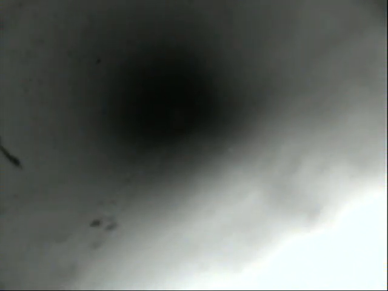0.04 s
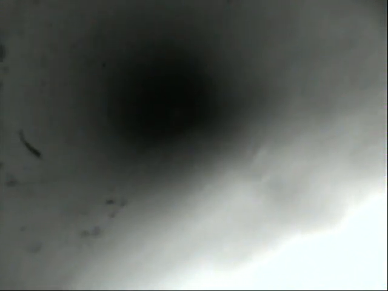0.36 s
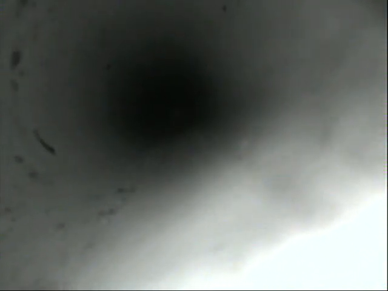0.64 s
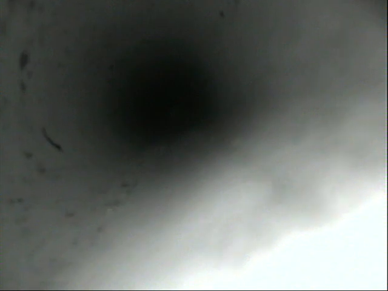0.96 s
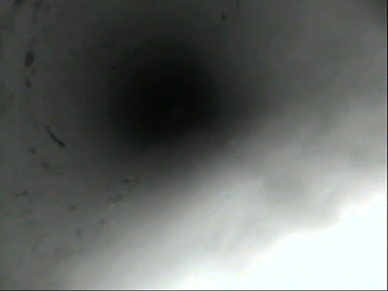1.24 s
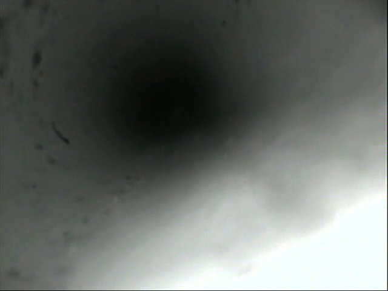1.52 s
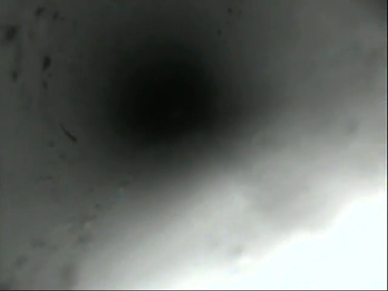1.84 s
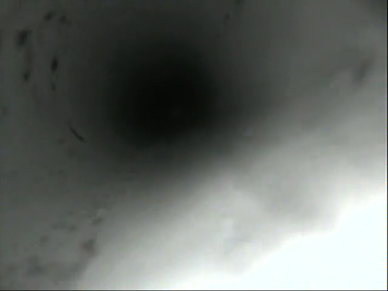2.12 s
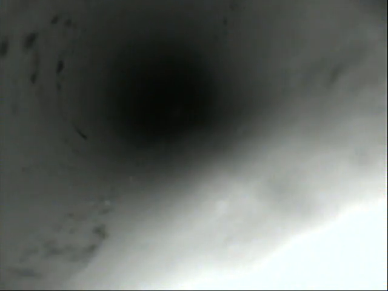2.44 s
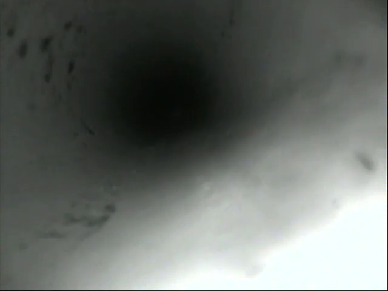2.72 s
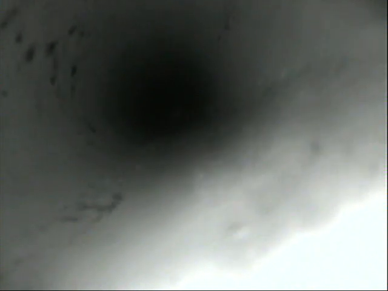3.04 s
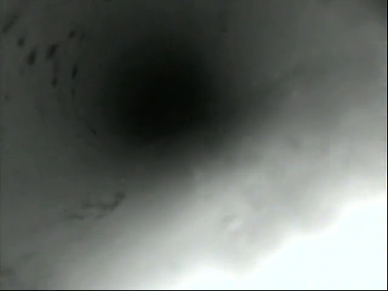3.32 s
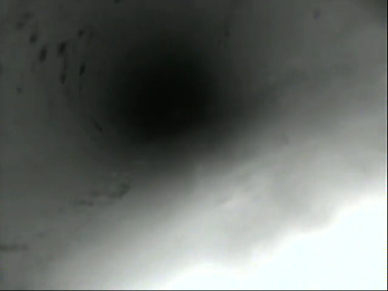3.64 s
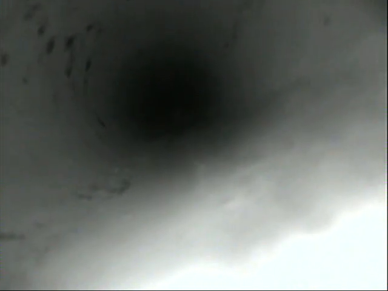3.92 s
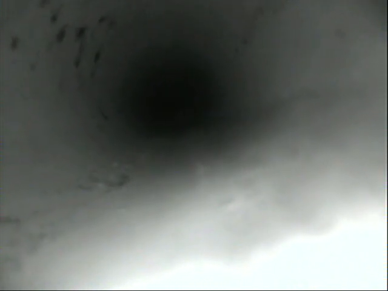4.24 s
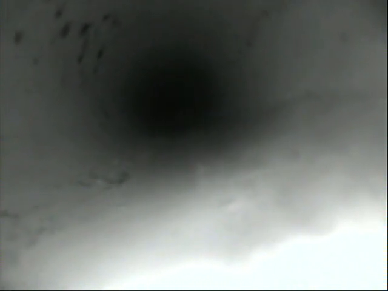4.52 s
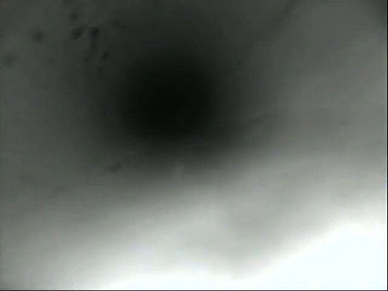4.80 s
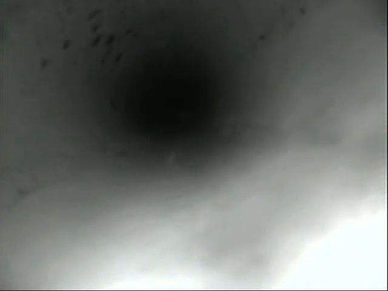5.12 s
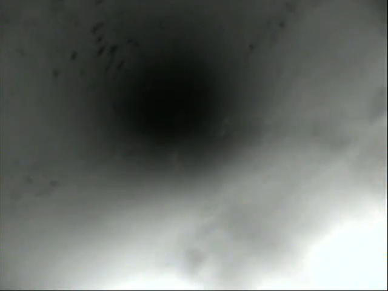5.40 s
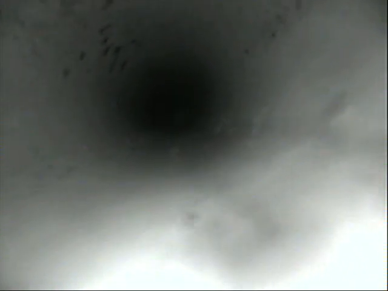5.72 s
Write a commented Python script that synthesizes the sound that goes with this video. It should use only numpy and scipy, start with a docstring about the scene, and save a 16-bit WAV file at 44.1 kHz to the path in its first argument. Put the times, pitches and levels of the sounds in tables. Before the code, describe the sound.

A steady electrical hum and thin whine sit over a low rumble and soft hiss throughout, heard close up on one microphone inside a sewer pipe. An inspection camera's head slides along with a faint, uneven rustle and small gritty scuffs. At about 0.2 seconds it gives a light double knock, followed by soft chafing and a faint squeak. The sound cuts out for an instant near 1.5 seconds. Quiet scuffs continue, with another faint squeak around 2.4 seconds. At 3.7 seconds comes the loudest event, a hard, quick clatter against the wall with a brief ring and a low thump from the push rod. Lighter knocks and a tiny squeak follow until 3.9 seconds. A duller knock lands at 4.5 seconds, then a cluster of soft bumps with a scrape around 4.8 to 4.9. The sliding dies down, leaving hum and hiss until nearly 6 seconds.

```python
"""An inspection camera's head knocks and scrapes along a sewer pipe, heard close up on one microphone.
A few times it clatters against the wall, each knock a quick run of contacts that ring the head and
thump its push rod. In between it slides with a faint rustle, scuffs over grit, chafes and squeaks.
Behind it the electronics hum and whine over a low rumble and hiss.
The narrow-band sound channel cuts out once for an instant."""
import sys
import numpy as np
from scipy import signal
from scipy.fft import rfft, irfft
from scipy.io import wavfile
from scipy.ndimage import uniform_filter1d

SR = 44100
rng = np.random.default_rng(int(sys.argv[2]) if len(sys.argv) > 2 else 0)


def log_audio(samples):
    """Write samples as a 16-bit WAV file to the path given in sys.argv[1]."""
    # one column per channel
    frames = np.atleast_2d(samples).T
    # limit to full scale, then quantise
    limited = np.clip(frames, -1, 1)
    pcm = np.round(limited * 32767).astype(np.int16)
    wavfile.write(sys.argv[1], SR, pcm)


N = 254016
T = np.arange(N) / SR

# resonances of the low rumble: centre_hz, width_hz, level_db
RUMBLE_BANDS = [(33.85, 3.2, -51.5), (59.1, 11, -54), (79.5, 4.3, -62)]
# colour of the steady hiss: frequency_hz, relative_db
HISS_COLOUR = [(15, 2), (60, 5), (95, 1.5), (170, -.5), (300, -4), (550, -5.5), (830, -4), (1250, -9),
               (1950, -14), (2350, -21.5), (3700, -25), (4700, -34), (6600, -35.5), (8800, -58.5)]
# harmonics of the electrical hum: multiple, level_db
HUM_HARMONICS = [(1, -52), (2, -64.5), (3, -61), (4, -61.5), (5, -67.5)]
# harmonics of the electrical whine: multiple, level_db
WHINE_HARMONICS = [(1, -67), (2, -67.5)]
# thin whistles of the electronics: pitch_hz, level_db
WHISTLE_TONES = [(4000, -88), (5626, -95), (5997, -96), (6250, -98), (6874, -96), (8000, -107)]
# soft stretches of chafing: peak_s, level_db, length_s
CHAFE_SWELLS = [(.28, -63, 0.34), (1.25, -66, 0.29), (2.1, -67, 0.3), (4.88, -62.5, 0.039)]
# squeaks where the head sticks and slips: peak_s, level_db, length_s, pitch_hz
SQUEAK_SWELLS = [(0.18, -73, .02, 5920), (0.4, -64, 0.12, 1880), (2.375, -63, 0.075, 1903),
                 (2.85, -75, 0.036, 6000), (3.879, -49, 0.0084, 2870), (3.948, -77, .025, 6000)]
# how hard the sliding head rubs the wall: time_s, friction_db
FRICTION_CURVE = [(0, -5), (.75, -0.5), (.98, -3), (1.27, -4), (1.52, -11), (1.75, -7), (2.76, -6),
                  (2.98, 1.5), (3.32, -1.5), (3.62, -7.5), (3.82, 3), (4.18, 2), (4.42, -11), (4.55, 0),
                  (5.02, -7), (5.25, 2), (5.42, -20), (5.76, -16)]
# colour of sliding and grit: frequency_hz, relative_db
GRIT_COLOUR = [(100, -8), (500, 7.5), (1200, 12), (1900, 1), (2400, -12.5), (3200, -11), (3800, -18),
               (4600, -18), (6200, -22.5), (7300, -30), (8700, -45.5)]
# scuffs over grit: peak_s, rub_db, length_s, tick_db
GRIT_SCUFFS = [(.005, -42, 0.053, -63), (0.14, -45.5, 0.022, -65), (0.206, -37, 0.022, -57),
               (0.326, -45.5, 0.026, -63), (1.659, -45.5, 0.022, -63), (1.742, -46, 0.024, -67),
               (1.823, -51, 0.025, -64), (2.147, -50.5, 0.021, -71), (2.22, -47.5, 0.02, -64),
               (2.572, -53, .016, -65), (3.052, -44, 0.023, -62), (3.218, -46, 0.024, -60.5),
               (3.429, -46.5, 0.019, -66), (4.85, -40.5, 0.11, -67.5)]
# resonances that crushed grains ring: centre_hz, width_hz, relative_db
GRAIN_BANDS = [(3750, 200, -2.5), (4030, 300, -8), (4570, 200, -15.5)]
# light swishes along the wall: peak_s, level_db, length_s
WALL_SWISHES = [(.175, -71, 0.023), (.51, -69, 0.012), (2.33, -74, .04), (2.855, -69.5, 0.026),
                (3.948, -73, 0.025), (4.85, -77, 0.067)]
# colour of a swish: frequency_hz, relative_db
SWISH_COLOUR = [(1500, -12), (3800, 7.5), (4800, 0.5), (6200, 3), (7300, -6.5), (9000, -34)]
# knocks on the wall: start_s, ring_db, thump_db, hardness_db_per_octave, first_gap_s, rebound_loss_db
WALL_KNOCKS = [(.202, -28, -55, -2, .007, 12), (.246, -38, -49, 6, .008, 6.5),
               (3.7064, -10.5, -18.5, 5, .0085, 3.5), (3.741, -22.5, -27, -5, .014, 6.5),
               (3.835, -25, -31.5, 2, .007, 4), (3.875, -25.5, -33, 1, .011, 6),
               (4.51, -21.5, -28.5, -10, .0102, 4.5), (4.818, -30.5, -29.5, -10.5, .009, 6.5),
               (4.834, -29, -43, -14, 0.0078, 12), (4.862, -28, -25.5, -9, 0.0091, 6),
               (4.907, -34, -34, 2, 0.0082, 17)]
# modes of the camera head: pitch_hz, relative_db, t60_s
HEAD_MODES = [(421, -27, 0.091), (669, -14, 0.089), (813, -4.5, 0.03), (1133, -1.5, 0.034),
              (1201, -1.5, 0.035), (1410, -22, 0.059), (1587, -16, 0.052), (1780, -16, 0.037),
              (2035, -32.5, 0.05), (2876, -31, 0.072), (3400, -32.5, 0.049), (4100, -43, 0.05),
              (5100, -34, 0.029)]
# low modes of the head on its push rod: pitch_hz, relative_db, t60_s
ROD_MODES = [(56.5, -1, 0.09), (136.6, 2.5, 0.073), (180.5, -9, 0.088)]
# colour of the crunch at each contact: frequency_hz, relative_db
CRUNCH_COLOUR = [(80, 9), (250, 2), (800, 3.5), (970, -3), (1200, 0), (1800, 0), (2300, -15), (3300, -17.5),
                 (4200, -26.5), (5300, -31), (6500, -48.5), (8700, -65)]


def undb(db):
    """Decibels to gain."""
    return 10 ** (np.asarray(db) / 20)


def unit(x):
    """Scale to rms 1."""
    return x / np.sqrt(np.mean(x ** 2))


def shape(x, gain):
    """Filter by a gain that is a function of frequency."""
    hz = np.maximum(np.arange(len(x) // 2 + 1) * SR / len(x), 1)
    return irfft(rfft(x) * gain(hz), len(x))


def noise(colour, size=N):
    """Noise of rms 1 with a colour of (frequency_hz, relative_db) points."""
    hz, db = np.transpose(colour)
    return unit(shape(rng.standard_normal(size), lambda f: undb(np.interp(np.log(f), np.log(hz), db))))


def resonant(hz, width):
    """Noise of rms 1 ringing in one resonance."""
    return unit(shape(rng.standard_normal(N), lambda f: 1 / (1 + 1j * (f * f - hz * hz) / (f * width))))


def walk(rate_hz):
    """Random levels held 1 / rate_hz seconds and smoothed twice; rms 1."""
    hold = max(int(SR / rate_hz), 1)
    steps = np.repeat(rng.standard_normal(N // hold + 1), hold)
    return unit(uniform_filter1d(uniform_filter1d(steps, hold), hold)[:N])


def tone(hz, db):
    """A steady sine of the given rms level."""
    return np.sqrt(2) * undb(db) * np.sin(2 * np.pi * (hz * T + rng.random()))


def fade(t, t60):
    """Exponential decay by 60 dB in t60 seconds."""
    return np.exp(-np.log(1000) * t / t60)


def swells(rows):
    """A bell-shaped rise and fall for each (peak_s, level_db, length_s) row."""
    return sum(undb(db) * np.exp(-2 * ((T - s) / length) ** 2) for s, db, length in rows)


def add(out, start_s, sound):
    """Mix a sound in at start_s."""
    start = int(start_s * SR)
    out[start:start + len(sound)] += sound


def background(hiss_db=-50.5, rumble_top_hz=200):
    """The bed inside the pipe: even hiss over a rumble in three low resonances."""
    rumble = sum(undb(db) * resonant(hz, width) for hz, width, db in RUMBLE_BANDS)
    rumble = shape(rumble, lambda f: 1 / (1 + (f / rumble_top_hz) ** 2))
    return rumble + undb(hiss_db) * noise(HISS_COLOUR)


def electronics(hum_hz=218.97, whine_hz=492.6, waver_db=-0.6):
    """The camera's electronics: two harmonic tones that waver together, and thin steady whistles."""
    hum = sum(tone(k * hum_hz, db) for k, db in HUM_HARMONICS)
    whine = sum(tone(k * whine_hz, db) for k, db in WHINE_HARMONICS)
    waver = undb(waver_db * walk(20))
    whistles = sum(tone(hz, db) for hz, db in WHISTLE_TONES)
    return (hum + whine) * waver + whistles


def chafing(centre_hz=2100, width_hz=650, top_hz=3500, grain_db=-3.5):
    """A soft, grainy rub in one broad resonance."""
    rub = shape(resonant(centre_hz, width_hz), lambda f: 1 / (1 + (f / top_hz) ** 6))
    return swells(CHAFE_SWELLS) * unit(rub * undb(grain_db * walk(500)))


def squeaks(pitch_spread=.009, rough_db=2):
    """The head sticks and slips: short tones whose pitch and strength are unsteady."""
    unsteady_time = np.cumsum(1 + pitch_spread * walk(300)) / SR
    tones = sum(swells([(s, db, length)]) * np.sin(2 * np.pi * hz * unsteady_time)
                for s, db, length, hz in SQUEAK_SWELLS)
    return np.sqrt(2) * tones * undb(rough_db * walk(200))


def sliding(rustle_db=-61, hiss_db=-74.5, catch_db=2.5, grain_db=3.0, scuff_db=-5, tick_top_hz=6000):
    """Friction on the wall catches unevenly and swells, with a high tick, where the head crosses grit."""
    friction = np.interp(T, *np.transpose(FRICTION_CURVE))
    catch = catch_db * walk(30)
    drag = undb(rustle_db + 0.31 * friction + catch)  # the rustle follows friction less than the hiss
    hiss = undb(hiss_db + friction + catch)
    grains = unit(undb(grain_db * walk(500)))
    scuffs = swells([(s, db, length) for s, db, length, _ in GRIT_SCUFFS])
    crush = swells([(s, db, length) for s, _, length, db in GRIT_SCUFFS])
    ticks = sum(undb(db) * resonant(hz, width) for hz, width, db in GRAIN_BANDS)
    ticks = shape(ticks, lambda f: 1 / (1 + (f / tick_top_hz) ** 8))
    rub = (drag + undb(scuff_db) * scuffs) * noise(GRIT_COLOUR)
    swish = (hiss + swells(WALL_SWISHES)) * noise(SWISH_COLOUR)
    return grains * (rub + crush * ticks + swish)


def ring(modes, t, scatter_db, detune):
    """Decaying modes; every contact point weights and tunes them a little differently."""
    chance = rng.standard_normal((len(modes), 2))
    return sum(undb(db + scatter_db * a) * fade(t, t60) * np.sin(2 * np.pi * hz * (1 + detune * b) * t)
               for (hz, db, t60), (a, b) in zip(modes, chance))


def chatter(gap_s, loss_db, count=5, graze_db=-4.5, gap_ratio=.9, jitter_s=.00035):
    """A graze, the blow and ever quicker rebounds: delay_s, relative_db, hardness_change_db_per_octave."""
    contacts = [(-gap_s / gap_ratio, graze_db, 0)]
    delay = 0
    for k in range(count):
        contacts.append((delay, -k * loss_db, -k * 2))  # each rebound is 2 dB per octave duller
        delay += gap_s * gap_ratio ** k
    return [(delay + jitter_s * rng.standard_normal(), db, softer) for delay, db, softer in contacts]


def knocks(crunch_db=-7.0, crunch_t60=0.056, pipe_db=-27, pipe_t60=0.38,
           tilt_hz=1500, onset_s=0.0049, rod_lag_s=0.0031):
    """Each contact rings the head, thumps the rod and crunches; the pipe adds a short tail."""
    size = SR // 2
    t = np.arange(size) / SR
    out = np.zeros(N + size)
    onset = np.sin(np.pi / 2 * np.clip(t / onset_s, 0, 1)) ** 2
    crunch_decay = undb(crunch_db) * fade(t, crunch_t60) + undb(pipe_db) * fade(t, pipe_t60)
    for start_s, ring_db, thump_db, hardness, gap_s, loss_db in WALL_KNOCKS:
        for delay, db, softer in chatter(gap_s, loss_db):
            crunch = noise(CRUNCH_COLOUR, size) * crunch_decay
            head = ring(HEAD_MODES, t, scatter_db=4.5, detune=0.0055) + crunch
            tilt = hardness + softer  # a harder contact is shorter, so it lifts the treble
            head = shape(head * onset, lambda f: undb(tilt * np.log2(1 + (f / tilt_hz) ** 4) / 4))
            thump = ring(ROD_MODES, t, scatter_db=3, detune=0.02) * onset
            add(out, start_s + delay, undb(ring_db + db) * head)
            add(out, start_s + delay + rod_lag_s, undb(thump_db + db) * thump)  # the heavy rod is late
    return out[:N]


def scene():
    """All sources at the one microphone in the pipe."""
    return (electronics() + background() + sliding() + squeaks() + knocks() + chafing())[None]


def record(dry):
    """The microphone's channel falls silent for an instant and carries no top treble."""
    cut_s, back_s, top_hz = 1.4603, 1.4792, 8500
    live = (T < cut_s) | (T > back_s)
    lowpass = signal.ellip(8, .2, 70, top_hz, fs=SR, output="sos")
    return signal.sosfilt(lowpass, dry * live)


dry = scene()
out = record(dry)
log_audio(out)
```